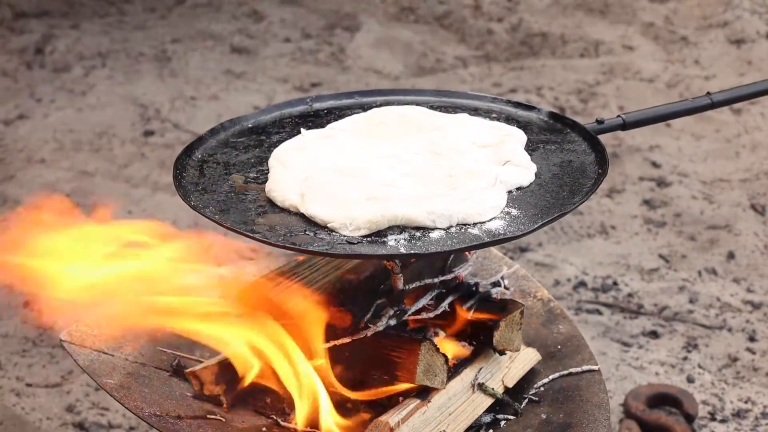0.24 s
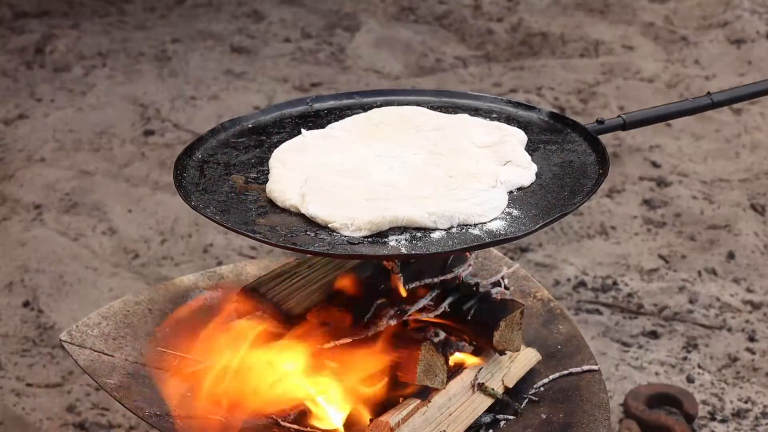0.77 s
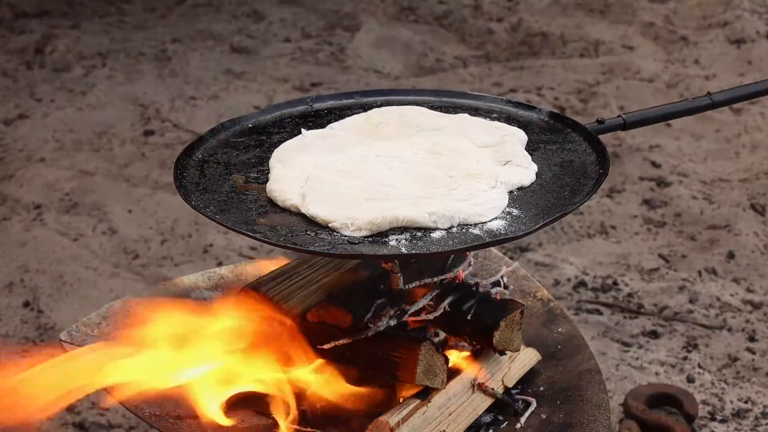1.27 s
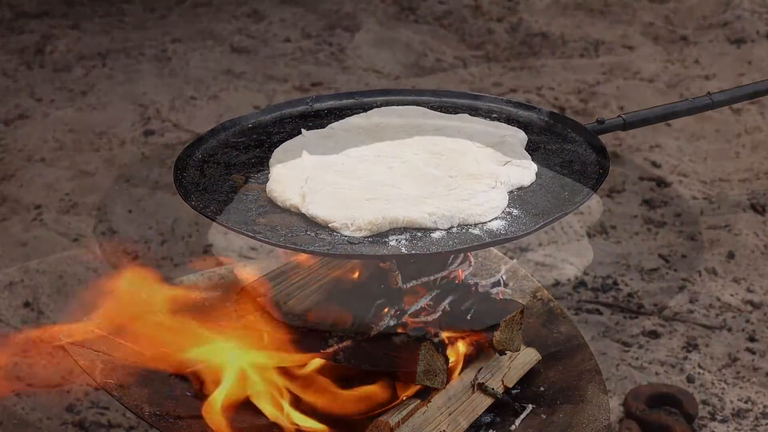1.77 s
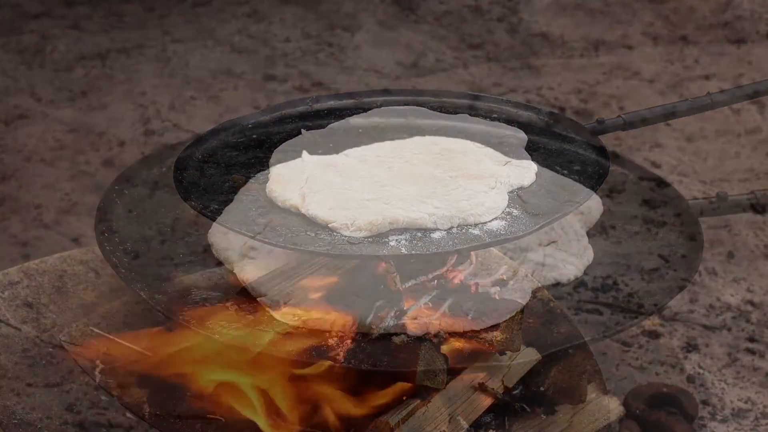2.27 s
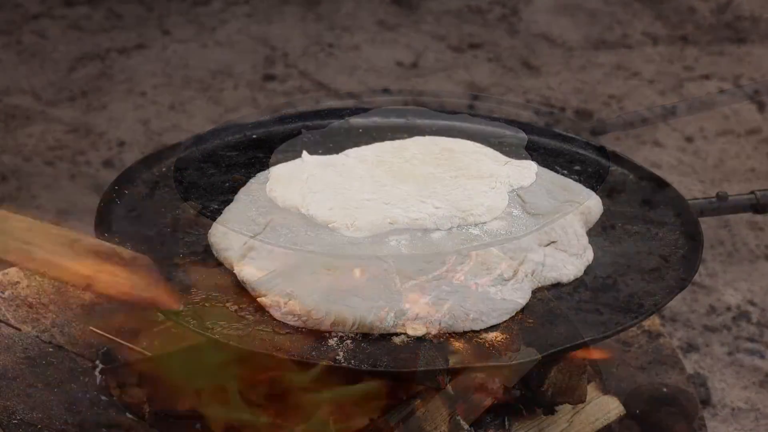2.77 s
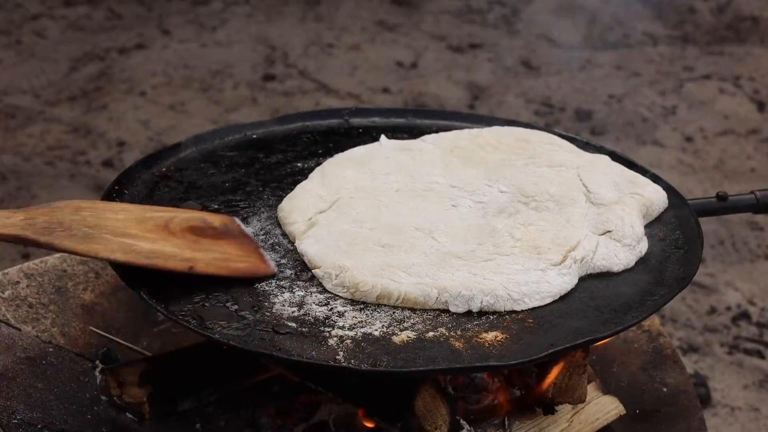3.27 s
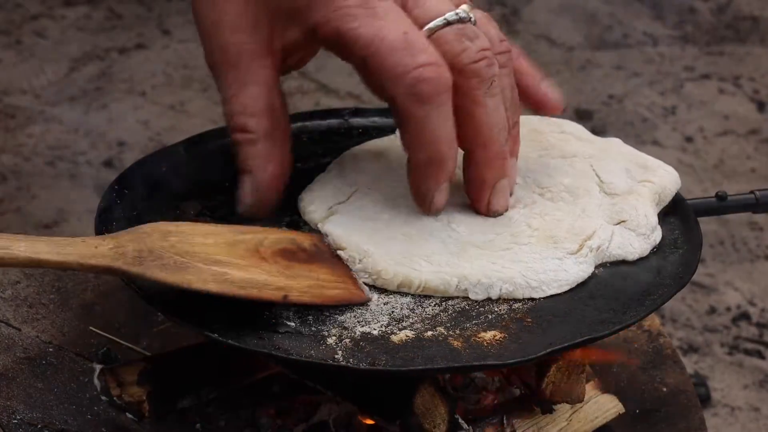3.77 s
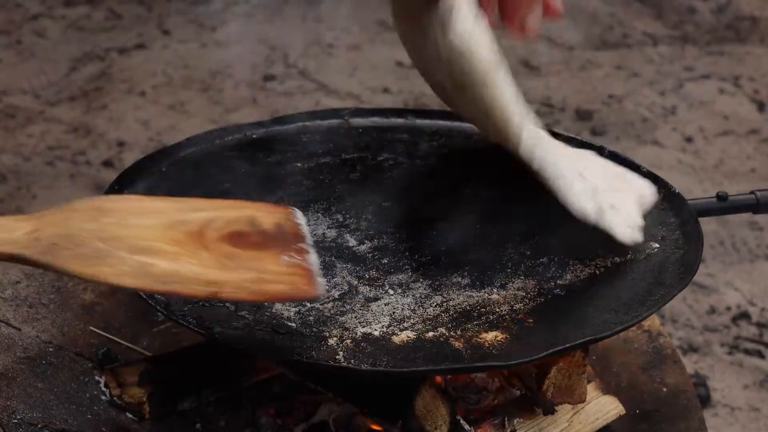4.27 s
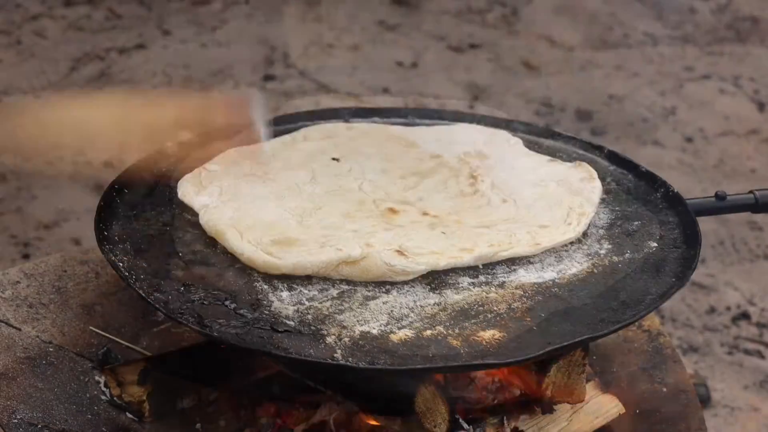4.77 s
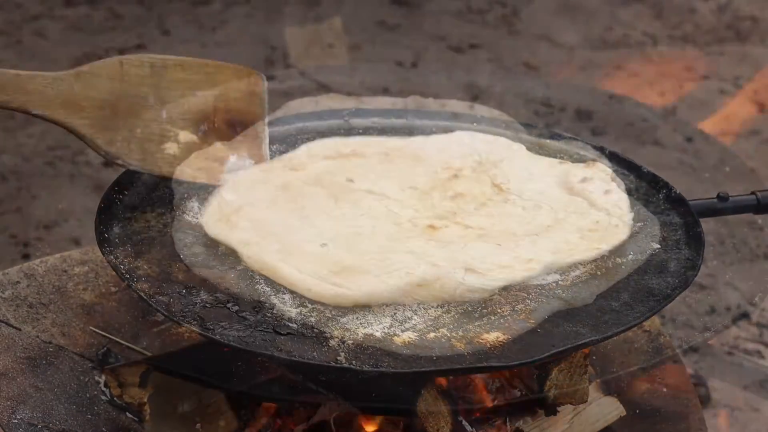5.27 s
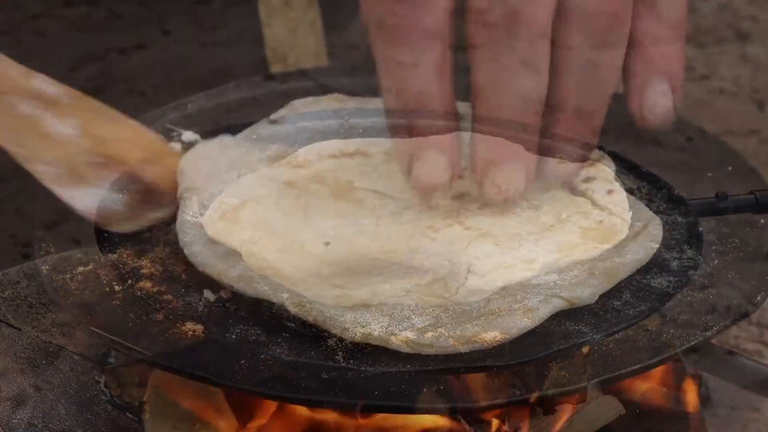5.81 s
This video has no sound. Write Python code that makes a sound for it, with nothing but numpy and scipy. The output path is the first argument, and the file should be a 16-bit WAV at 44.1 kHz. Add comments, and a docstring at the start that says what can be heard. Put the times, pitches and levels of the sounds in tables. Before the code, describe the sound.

Close, dry and centred: flames puff and rumble low while logs spit gas and snap, one sharp pop near half a second. Then the flames sink back and wood clacks on an iron griddle, ringing briefly. Gritty strokes push under floury dough with faint thin pan tones, the spatula clatters down, and stronger scraping ends the scene over tiny crackles and open air.

```python
"""Flatbread bakes on an iron griddle over an open wood fire, outdoors, heard from close by.
First the flames flutter in noise and clustered puffs, while the logs hiss in grainy spurts and pop as short
resonant bursts. Then the fire is quieter: a wooden spatula knocks on the pan with a clack and ringing modes,
scrapes through flour under the dough as dense grains, with thin tones and low rubbing from resonant noise,
clatters down as the bread is turned and slides under it again. A fine crackle and open air last throughout."""
import sys
import numpy as np
from scipy import signal
from scipy.fft import rfft, irfft, next_fast_len
from scipy.io import wavfile

SR = 44100
rng = np.random.default_rng(int(sys.argv[2]) if len(sys.argv) > 2 else 0)


def wrap_up_sound(samples):
    """Save the sound to the file named by the first command line argument, as 16-bit audio."""
    columns = np.atleast_2d(samples).T
    # keep every value between -1 and 1, then stretch to whole-number steps
    tamed = np.clip(columns, -1, 1)
    steps = np.round(tamed * 32767).astype(np.int16)
    wavfile.write(sys.argv[1], SR, steps)


N = 266527
TIME = np.arange(N) / SR
AGE = TIME[:SR // 2]   # time since a blow [s]
CLICK = 1.0 * (AGE == 0)

# All spectra below are relative: (frequency [Hz], level per hertz [dB])

# Spatula blows: (time [s], clack level [dB], ring level [dB], contact brightness [Hz],
#                 place [0 rim - 1 middle])
KNOCKS = [(2.8052, -29.5, -46, 4200, 0), (2.8085, -24, -42, 9000, 0), (2.8102, -21.5, -23.3, 11000, 0),
          (2.9161, -29.5, -40, 3400, 0), (3.934, -46.5, -55, 3000, 1), (4.6522, -27.5, -42, 1100, 1),
          (4.6797, -33, -43, 5000, 1), (4.6918, -22.3, -29, 12000, 1), (5.0853, -42, -45, 4200, 1)]
# Modes heard when the spatula strikes the griddle: the iron's, and probably the blade's at 1003 Hz:
# (frequency [Hz], t60 [s], relative level struck at the rim [dB], relative level struck in the middle [dB])
STRIKE_MODES = [(285, .17, -36, -17), (555, .09, -20, -14), (645, .13, -15, -7), (1003, .05, -10, -14),
                (1141, .15, -30, -13), (1213, .15, -26, -13), (1293, .37, -12, -32), (1470, .06, -21, -4),
                (1759, .17, -12, -3), (1804, .2, -6, -1), (2052, .11, 2, -22), (2316, .11, 0, 0),
                (2600, .16, -20, -18), (2756, .14, -8, -22), (2836, .15, -2, -5), (3521, .1, -13, -26),
                (3607, .08, -10, -20), (3716, .12, -5, -13), (3892, .12, -21, -22), (4400, .12, -28, -16),
                (4576, .08, -17, -9), (5257, .1, -19, -20), (5690, .2, -23, -30), (6261, .1, -16, -22),
                (6783, .17, -14, -32), (7413, .12, -24, -18), (7817, .07, -4, -19), (7930, .04, -8, -11),
                (8505, .1, -23, -11), (9039, .055, -24, -15), (10600, .08, -25, -30)]
# Spectrum of the quickly dying clack of wood on iron: (frequency [Hz], level per hertz [dB])
CLACK_SPECTRUM = [(240, -41), (350, -2), (600, -7), (780, -6.5), (1030, 4), (1800, 1), (3000, -4),
                  (4600, -13.5), (6200, -7), (8500, -4), (10500, -17), (16000, -27)]
# Modes of the wooden blade, free to ring at the rim: (frequency [Hz], t60 [s], relative level [dB])
BLADE_MODES = [(395, 0.026, -4.5), (570, 0.018, -4), (982, 0.028, 2)]
BLADE_DB, PUSH_DB = -6, -4   # relative to the rattle of the contact
# In the middle the dough damps the blade to a dull push, shorter for a harder contact
PUSH_SOFT_HZ = 503   # pitch at 1 kHz contact brightness
PUSH_FOLLOWS, PUSH_WIDTH = 0.35, 0.92   # octaves per octave of brightness; width as share of pitch

# Spatula strokes: (start [s], length [s], friction level [dB],
#                   flour hiss as share of the power [dB], held to 0.9 of the power at most)
STROKES = [(2.904, 0.48, -48, -3), (3.006, 0.14, -39, -4), (3.307, 0.1, -51, -1.5),
           (3.396, 0.2, -52.5, -1.5), (3.514, 0.17, -44.5, -3.5), (3.666, 0.8, -56.5, -3),
           (3.924, 0.097, -49.5, -1.5), (4.233, 0.077, -47, -1.8), (4.285, 0.13, -47, -1.2),
           (4.647, 0.038, -41.5, -2), (4.667, 0.049, -33, -6), (4.686, 0.078, -45, -6),
           (4.749, 0.12, -55.5, -1.5), (4.829, 0.055, -51.5, 7), (5.131, 0.21, -49, -2.5),
           (5.299, 0.15, -56, -9), (5.724, 0.15, -50.5, -3.5), (5.783, 0.65, -39.5, -6.5),
           (5.981, 0.21, -36, -10.5)]
STROKE_RISE, STROKE_FALL, STROKE_SAG_DB = 0.2, 0.36, 2.5   # shares of the length; loss in between
# Spectrum of wood rasping on iron: (frequency [Hz], level per hertz [dB])
RASP_SPECTRUM = [(250, -11.5), (550, -4), (780, -4.5), (1200, -0.5), (2400, 0.5), (4000, -1.5),
                 (5600, -5.5), (7000, -10.5), (10000, -27)]
# Spectrum of dry flour under the blade: (frequency [Hz], level per hertz [dB])
FLOUR_SPECTRUM = [(4000, -6), (6000, -1.5), (7200, -5.5), (8200, 2), (9300, 0.5), (10300, -9.5),
                  (13000, -3), (16000, -13)]
# Tones of the pan under the slipping blade, and low rubbing of pressed dough near 380 and 1220 Hz:
# (start [s], length [s], frequency [Hz], level [dB])
TONES_AND_RUBS = [(3.02, .11, 8510, -50), (3.31, .1, 1776, -57.5), (3.43, .076, 1805, -60),
                  (3.72, .48, 1220, -63), (3.8, .48, 376, -60.5), (3.92, 0.097, 8510, -50),
                  (3.94, .09, 1810, -57.5), (4.26, .13, 12200, -62), (4.283, 0.13, 8400, -57),
                  (4.307, .17, 2374, -62), (4.3, .2, 2800, -63), (4.33, 0.077, 6320, -60)]

# Pops in the firewood: (time [s], crack level [dB], pitch [Hz], first snap's share of the energy
#                        [0-1, held to 0.55 at most], hollow thud level [dB], thud pitch [Hz])
POPS = [(.116, -55.5, 8000, .3, -58, 700), (.824, -52, 8900, 0.5, -59, 700),
        (.3025, -51.5, 4050, 0.34, -55.5, 815), (0.4731, -31.5, 2130, 0.27, -37, 1010),
        (0.5625, -38, 7000, 0.7, -64, 700), (.582, -48, 12500, 0.16, -69, 700),
        (.7544, -52.5, 1680, 0.06, -50, 680), (0.9073, -51.5, 1440, 0.64, -45.5, 790),
        (1.0, -51, 4350, 0.03, -41.5, 367), (1.251, -52.5, 5000, 0.6, -67, 650),
        (1.334, -49, 4500, 0.26, -56, 700), (1.369, -53, 2000, 0.1, -44, 526),
        (1.409, -57, 2000, 0.4, -40.5, 570), (1.444, -50, 11000, 0.3, -61, 690),
        (1.4864, -42, 1910, 0.3, -36, 670), (1.507, -41, 4250, 0.16, -44, 980),
        (1.702, -46.5, 3520, 0, -46, 676), (2.004, -50, 4360, 0.33, -54, 846),
        (2.077, -44, 4000, 0, -47, 740), (2.134, -73, 4000, .1, -52, 920),
        (2.154, -48.5, 3420, 0.03, -46, 687), (2.9305, -45.5, 8850, 0.4, -61, 700),
        (3.215, -46, 7800, 0, -49, 620), (3.6987, -37, 6900, 0.04, -74, 700),
        (4.044, -52, 5170, 0.1, -64, 600), (4.594, -35.5, 2770, 0.7, -48, 820),
        (5.3323, -51, 2880, 0, -55, 890), (5.666, -57, 7950, 0.1, -61, 700),
        (5.694, -37, 2780, 0.15, -44.5, 537), (5.725, -56, 3000, .1, -53, 800)]
SPLINTER_CYCLES = 67   # a splintering dies (t60) within this many periods of its pitch

# Strength of the flames: (time [s], deep buffeting level [dB], roar level [dB])
FLAMES = [(0.0, -60, -54.5), (0.33, -48, -59.5), (0.55, -56, -53), (0.9, -53.5, -57.5), (1.06, -45, -51),
          (1.45, -57.5, -46.5), (1.62, -52.5, -53), (1.89, -48, -48), (2.0, -56, -51.5), (2.12, -47.5, -48),
          (2.41, -46.5, -48.5), (2.54, -49, -56.5), (2.85, -56, -54.5), (3.05, -73, -59.5),
          (3.5, -67, -60.5), (4.4, -68, -63), (5.2, -71, -61), (6.04, -66, -61.5)]
# Spectrum of the deep buffeting: (frequency [Hz], level per hertz [dB])
BUFFET_SPECTRUM = [(18, 9), (30, -2.5), (48, 6), (70, -0.5), (100, -13)]
# Spectrum of the low roar: (frequency [Hz], level per hertz [dB])
ROAR_SPECTRUM = [(50, -21), (75, -3.5), (115, -4.5), (190, -6.5), (260, -12.5), (400, -21.5)]
# Spectrum of the fluttering puffs: (frequency [Hz], level per hertz [dB])
FLUTTER_SPECTRUM = [(150, -13.5), (300, -5.5), (450, -2.5), (810, -1), (950, -10.5), (1400, -14.5),
                    (2600, -20.5)]
FLUTTER_DB, FLUTTER_FOLLOWS = -58, 0.86   # at the mean roar; dB per dB of roar

# Spurts of gas from the logs: (start [s], length [s], level [dB])
SPURTS = [(0.453, 0.22, -53.5), (0.625, 0.26, -55.5), (1.26, 0.11, -62), (1.487, 0.082, -45),
          (1.571, 0.18, -51), (1.713, .065, -45), (1.875, 0.14, -48), (2.014, 0.39, -53.5),
          (2.147, 0.02, -45.5)]
SPURT_RISE, SPURT_FALL, SPURT_SAG_DB = 0.24, 0.49, 1   # shares of the length; loss in between
# Spectrum of the hissing gas: (frequency [Hz], level per hertz [dB])
SIZZLE_SPECTRUM = [(530, 1), (900, -4.5), (1510, -11.5), (2300, -10), (2960, -6), (4410, -11),
                   (7680, -11.5), (12300, -17), (16000, -28)]
SIZZLE_DB, SIZZLE_FOLLOWS = -71, 1   # gassing between spurts: at the mean roar; dB per dB of roar

# Spectrum of the open air: (frequency [Hz], level per hertz [dB])
AIR_SPECTRUM = [(410, 2), (700, -8.5), (1230, 0), (1600, -5.5), (8880, -8), (10400, -11), (15000, -9),
                (16000, -21)]
AIR_DB = -58.5
CUTOFF_HZ = 15900


def knocks():
    """Wood strikes iron: a clack, then the modes that the place of the blow favours; soft contact dulls both."""
    out = np.zeros(N)
    blade = sum(from_db(db) * dying(t60) * np.cos(2 * np.pi * hz * AGE) for hz, t60, db in BLADE_MODES)
    blade = unit_blow(blade)
    for s, clack_db, ring_db, contact_hz, place in KNOCKS:
        push_hz = PUSH_SOFT_HZ * (contact_hz / 1000) ** PUSH_FOLLOWS
        push = unit_blow(resonance(CLICK, push_hz, PUSH_WIDTH * push_hz))
        wood = (1 - place) * from_db(BLADE_DB) * blade + place * from_db(PUSH_DB) * push
        rattle = unit_blow(coloured(rng.standard_normal(len(AGE)), CLACK_SPECTRUM) * dying(t60=0.045))

        ring = np.zeros(len(AGE))
        for k, (hz, t60, rim_db, middle_db) in enumerate(STRIKE_MODES):
            mode_db = np.interp(place, [0, 1], [rim_db, middle_db])
            sign = (-1) ** k   # neighbouring modes start in opposite directions
            ring += sign * from_db(mode_db) * dying(t60) * np.sin(2 * np.pi * hz * AGE)

        soft = signal.butter(2, contact_hz, fs=SR, output="sos")
        clack = unit_blow(signal.sosfilt(soft, rattle + wood))
        add(out, s, from_db(clack_db) * clack + from_db(ring_db) * signal.sosfilt(soft, ring))
    return out


def scrapes():
    """The blade slips over rough iron and dry flour; the tiny catches keep the struck modes faintly ringing."""
    rasp_power, flour_power = np.zeros((2, N))
    for s, length, db, flour_db in STROKES:
        envelope = gesture(s, length, STROKE_RISE, STROKE_FALL, STROKE_SAG_DB)
        power = (from_db(db) * envelope) ** 2
        flour_share = min(from_db(flour_db) ** 2, 0.9)
        rasp_power += power * (1 - flour_share)
        flour_power += power * flour_share
    rasp = np.sqrt(rasp_power) * coloured(grains(per_s=9000, spread_db=2.0), RASP_SPECTRUM)
    flour = np.sqrt(flour_power) * coloured(grains(per_s=16000, spread_db=4.0), FLOUR_SPECTRUM)
    friction = (rasp + flour) * flicker(rate=95, depth_db=1.4)

    ring = np.zeros(N)
    for hz, t60, *_ in STRIKE_MODES:
        width_hz = np.log(1000) / np.pi / t60   # long-lived modes are narrow
        # each mode comes and goes as the blade travels
        ring += resonance(friction * flicker(rate=12, depth_db=6), hz, width_hz)
    return friction + from_db(-1.5) * ring


def tones_and_rubbing():
    """Thin, rough pan tones and low rubbing of pressed dough: narrow resonant noise, each swells and fades."""
    out = np.zeros(N)
    for s, length, hz, db in TONES_AND_RUBS:
        swell = np.sqrt(np.hanning(round(length * SR)))
        tone = resonance(resonance(rng.standard_normal(len(AGE)), hz, 48), hz, 66)
        tone = rms_one(tone[-len(swell):])
        add(out, s, from_db(db) * swell * tone)
    return out


def pops():
    """A pocket of steam bursts: one snap, a short splintering, and the log's hollow answer."""
    out = np.zeros(N)
    for s, db, hz, snap, thud_db, thud_hz in POPS:
        splinter, wood = rng.standard_normal((2, len(AGE)))
        snap = min(snap, 0.55)
        splintering = unit_blow(splinter * dying(SPLINTER_CYCLES / hz))
        burst = np.sqrt(snap) * unit_blow(CLICK) + np.sqrt(1 - snap) * splintering
        width_hz = hz * (0.75 + 3.8 * snap)   # a cleaner snap is wider in pitch
        crack = resonance(resonance(burst, hz, width_hz), hz, width_hz) + 1.8 * snap * burst
        thud = resonance(wood * dying(t60=0.019), thud_hz, 0.49 * thud_hz)
        thud = resonance(thud, thud_hz, 1.6 * thud_hz)
        add(out, s, from_db(db) * unit_blow(crack) + from_db(thud_db) * unit_blow(thud))
    return out


def flames():
    """Turbulent burning: deep buffeting and a low roar, under a flutter made of many small puffs."""
    buffet_db, roar_db = in_time(FLAMES)
    buffet = from_db(buffet_db) * coloured(rng.standard_normal(N), BUFFET_SPECTRUM)
    roar = from_db(roar_db) * coloured(grains(per_s=500, spread_db=3.5), ROAR_SPECTRUM)
    puffs = grains(per_s=900, spread_db=2.5) * flicker(rate=45, depth_db=2.6)
    flutter = with_flames(FLUTTER_DB, FLUTTER_FOLLOWS) * coloured(puffs, FLUTTER_SPECTRUM)
    return buffet + roar + flutter


def hissing_logs():
    """Gas sputters from the wood as dense uneven grains, swelling in spurts over a steadier gassing."""
    spurts = np.zeros(N)
    for s, length, db in SPURTS:
        spurts += from_db(db) * gesture(s, length, SPURT_RISE, SPURT_FALL, SPURT_SAG_DB)
    gas = np.hypot(spurts, with_flames(SIZZLE_DB, SIZZLE_FOLLOWS))
    sputter = grains(per_s=2500, spread_db=3.0) * flicker(rate=120, depth_db=2.5)
    return gas * coloured(sputter, SIZZLE_SPECTRUM)


def fine_crackle():
    """Sparse tiny ticks at random moments: short noise bursts, each through one resonance."""
    ticks = np.zeros(N)
    for when, size, pitch in rng.random((70, 3)):
        hz = 3000 * 5 ** pitch   # 3 to 15 kHz
        tick = resonance(rng.standard_normal(len(AGE)) * dying(t60=0.01), hz, 0.2 * hz)
        add(ticks, when * TIME[-1], from_db(-65 + 4.5 * size ** 2) * unit_blow(tick))
    return ticks


def open_air():
    """The outdoors as steady coloured noise."""
    return from_db(AIR_DB) * coloured(rng.standard_normal(N), AIR_SPECTRUM)


def gesture(s, length, rise, fall, sag_db):
    """Envelope of one push: it swells, sags a little and lets go."""
    corners = s + length * np.array([0, rise, 1 - fall, 1])
    return np.interp(TIME, corners, [0, 1, from_db(-sag_db), 0])


def with_flames(db, follows):
    """Gain of a layer that rises and falls with the roar."""
    roar_db = in_time(FLAMES)[1]
    return from_db(db + follows * (roar_db - roar_db.mean()))


def from_db(db):
    """Decibels to gain."""
    return 10 ** (np.asarray(db) / 20)


def rms_one(x):
    """Scale to rms 1."""
    return x / np.sqrt(np.mean(x ** 2) + 1e-20)


def unit_blow(x):
    """Scale a transient to the energy of 10 ms at rms 1."""
    return x / np.sqrt(np.sum(x ** 2) / (0.01 * SR) + 1e-20)


def in_time(rows):
    """Each column of a curve, at every sample."""
    s, *columns = np.transpose(rows)
    return [np.interp(TIME, s, c) for c in columns]


def coloured(x, spectrum):
    """Give noise a spectrum that falls 20 dB per octave beyond its ends; rms 1."""
    hz, db = np.transpose(spectrum)
    size = next_fast_len(len(x))
    octave = np.log2(np.maximum(np.fft.rfftfreq(size, 1 / SR), 1))
    knots = np.log2(hz)
    outside = np.abs(octave - np.clip(octave, knots[0], knots[-1]))
    gain = from_db(np.interp(octave, knots, db) - 20 * outside)
    return rms_one(irfft(rfft(x, size) * gain, size)[:len(x)])


def flicker(rate, depth_db):
    """A randomly wavering gain of rms 1, with `rate` random steps per second."""
    steps = rng.standard_normal(4000)
    return rms_one(from_db(depth_db * np.interp(TIME * rate, np.arange(len(steps)), steps)))


def grains(per_s, spread_db):
    """Tiny clicks of uneven size and either sign at random moments; rms 1."""
    sizes = from_db(spread_db * np.minimum(rng.exponential(1, N), 5))
    moments = rng.random(N) < per_s / SR
    return rms_one(moments * sizes * rng.choice([-1, 1], N))


def resonance(x, hz, width_hz):
    """Two-pole resonance with gain 1 on top."""
    r = np.exp(-np.pi * width_hz / SR)
    zeros = np.array([1, 0, -1]) * (1 - r * r) / 2
    poles = [1, -2 * r * np.cos(2 * np.pi * hz / SR), r * r]
    return signal.lfilter(zeros, poles, x + 1e-18)


def dying(t60):
    """Envelope of a free decay, 60 dB down after t60 seconds."""
    return from_db(-60 * np.minimum(AGE / t60, 5))


def add(out, s, sound):
    """Mix a sound in at time s."""
    at = round(s * SR)
    out[at:at + len(sound)] += sound[:N - at]


def scene():
    """Spatula and pan, fire and open air, the same in both channels."""
    pan = knocks() + scrapes() + tones_and_rubbing()
    fire = pops() + flames() + hissing_logs() + fine_crackle()
    return np.tile(pan + fire + open_air(), (2, 1))


def record(dry):
    """The top is cut steeply by an elliptic low-pass."""
    return signal.sosfilt(signal.ellip(10, 0.1, 80, CUTOFF_HZ, fs=SR, output="sos"), dry)


dry = scene()
out = record(dry)
wrap_up_sound(out)
```